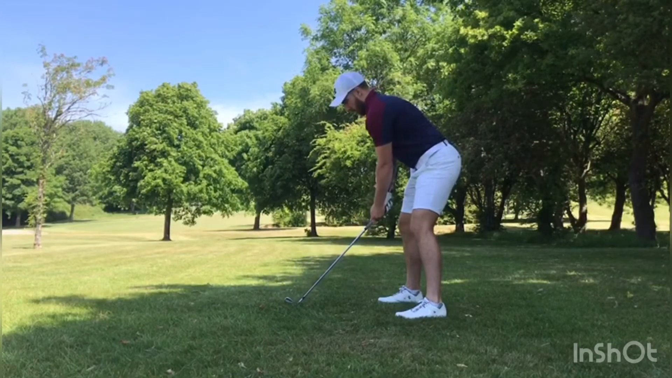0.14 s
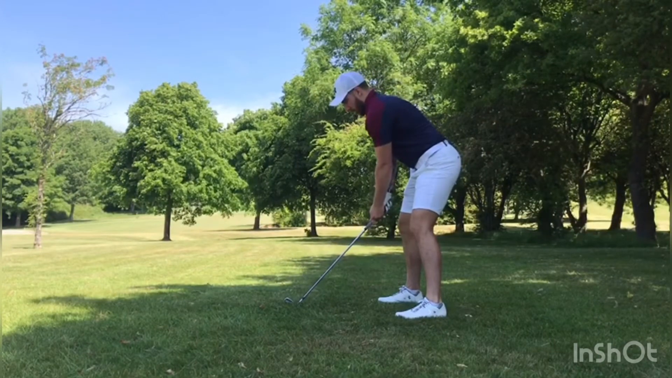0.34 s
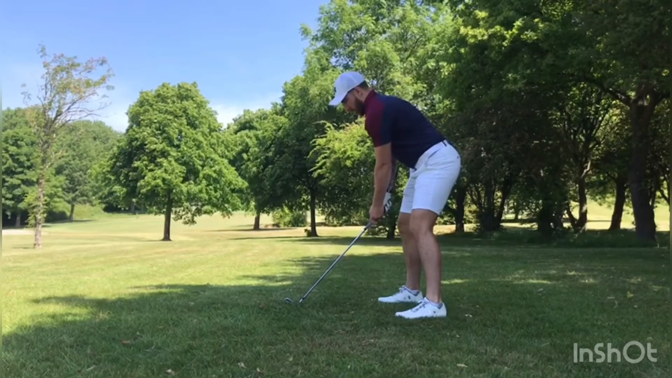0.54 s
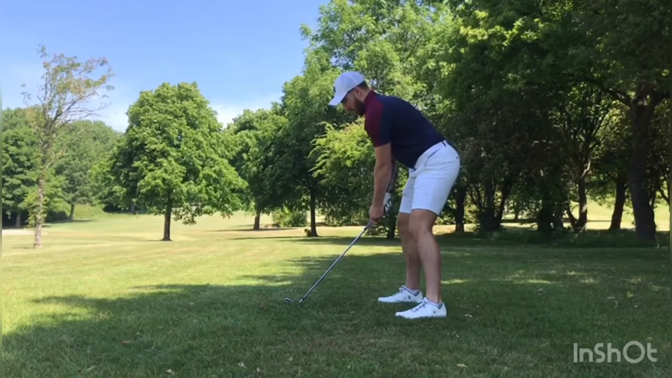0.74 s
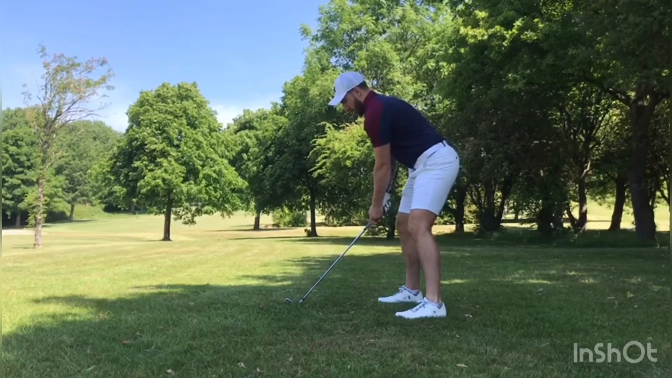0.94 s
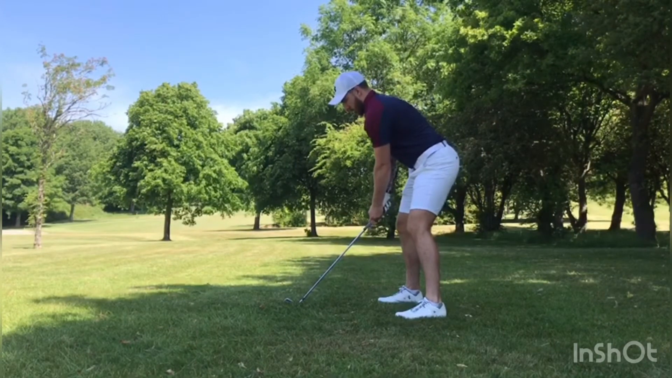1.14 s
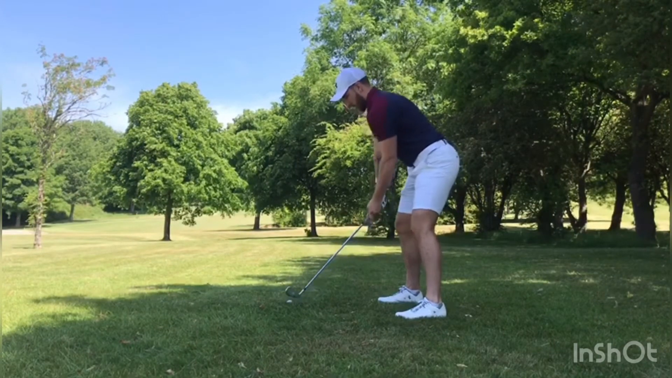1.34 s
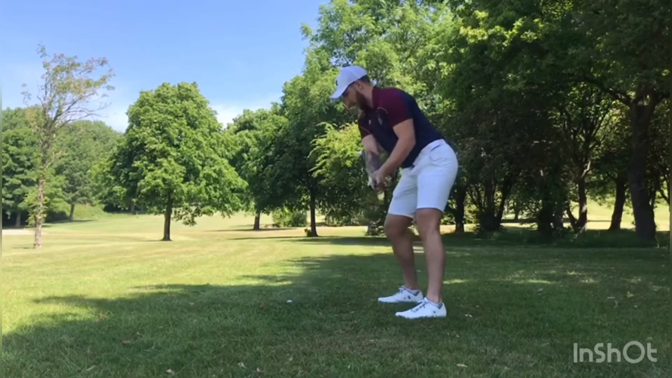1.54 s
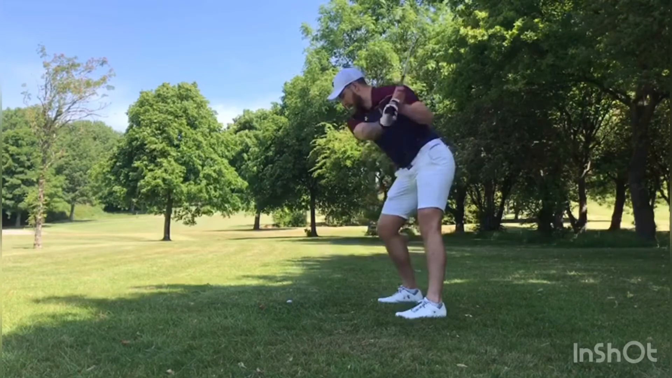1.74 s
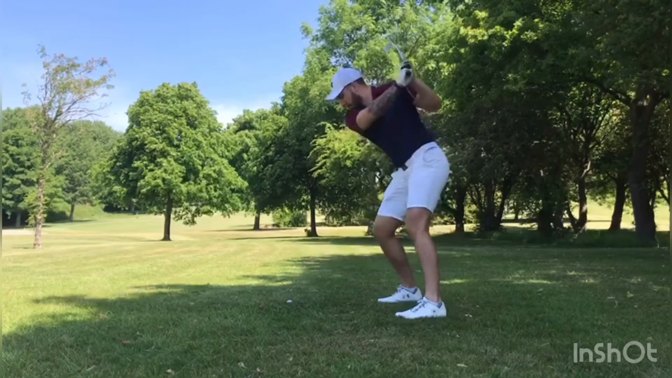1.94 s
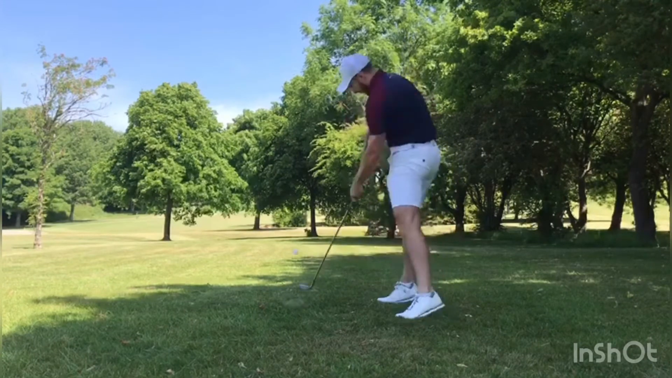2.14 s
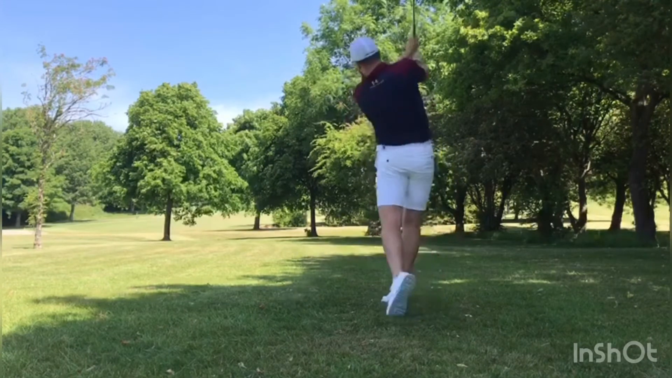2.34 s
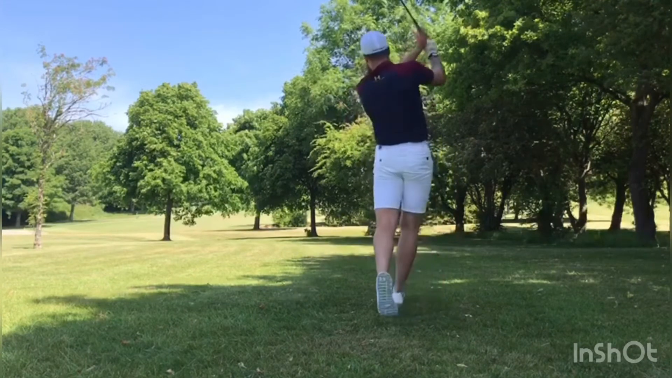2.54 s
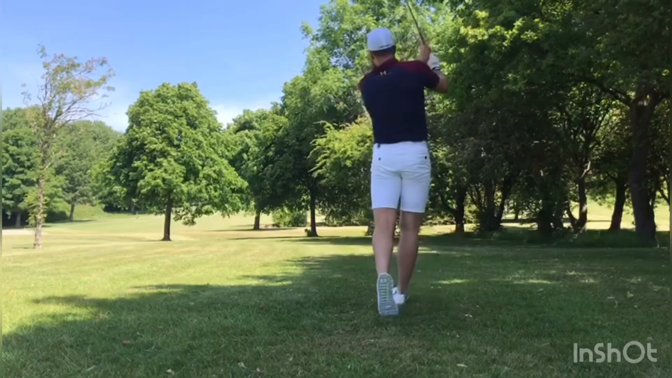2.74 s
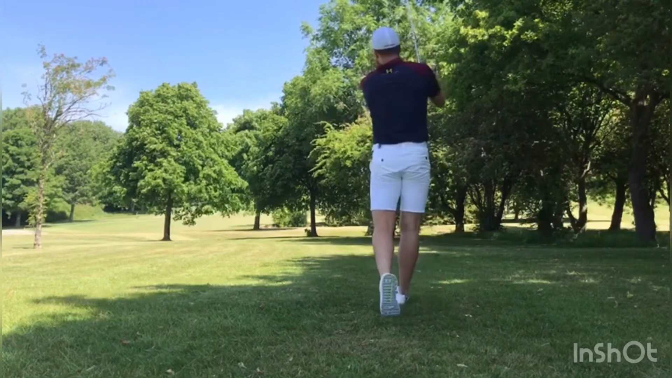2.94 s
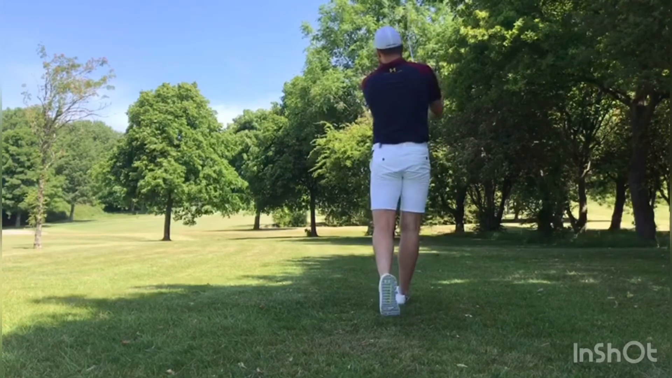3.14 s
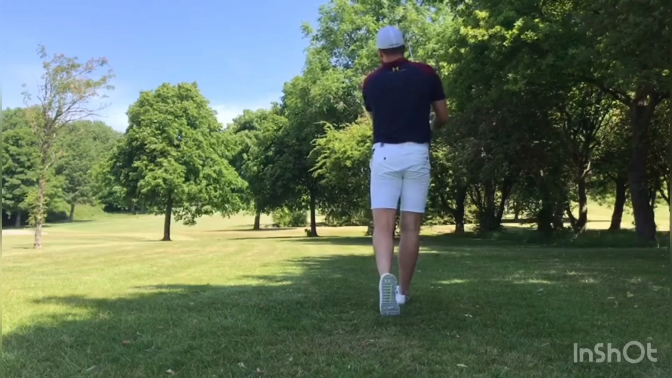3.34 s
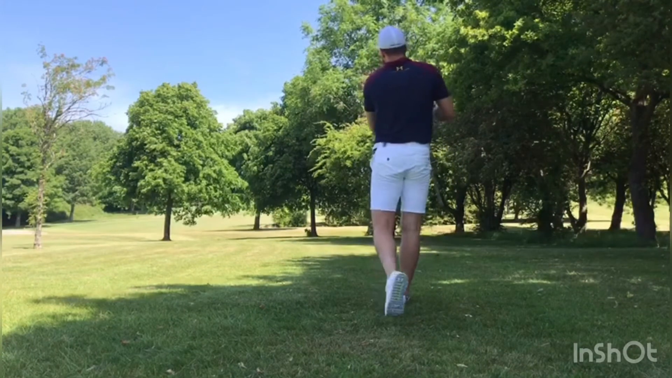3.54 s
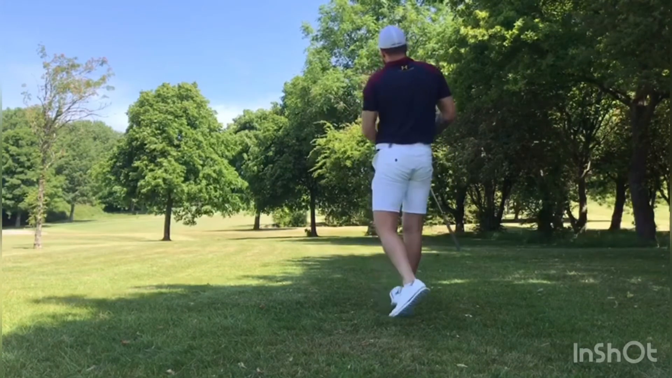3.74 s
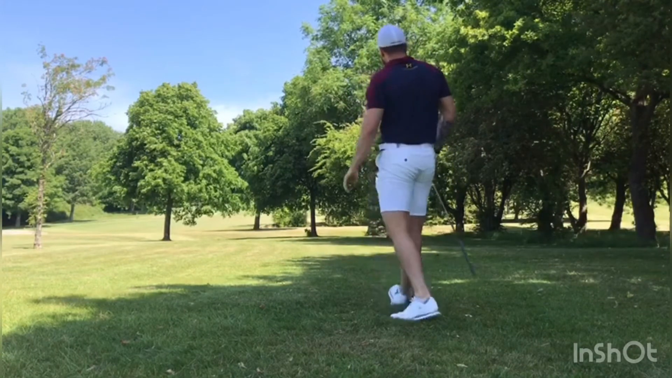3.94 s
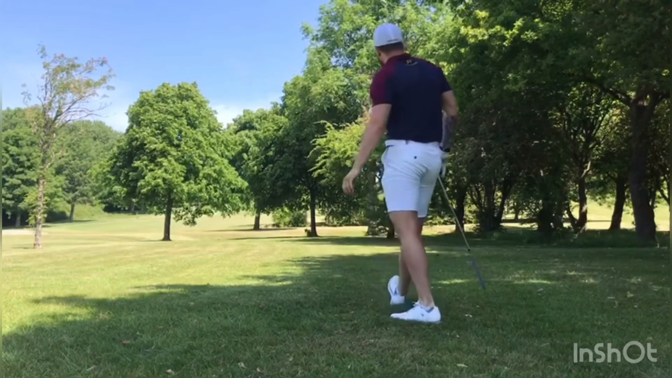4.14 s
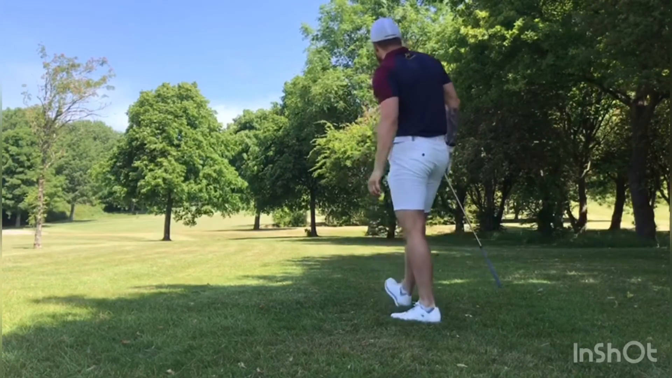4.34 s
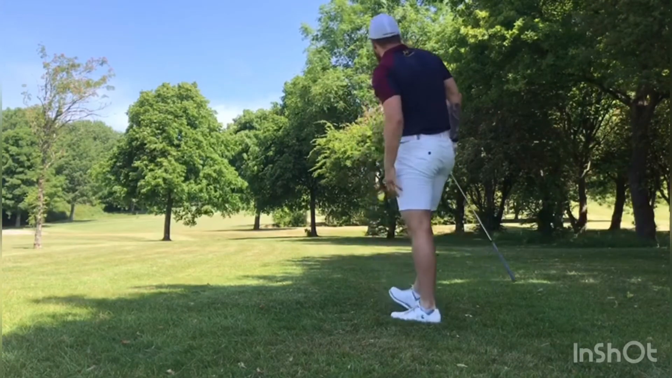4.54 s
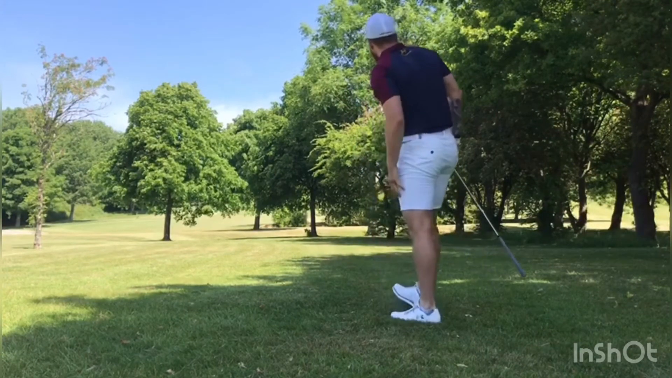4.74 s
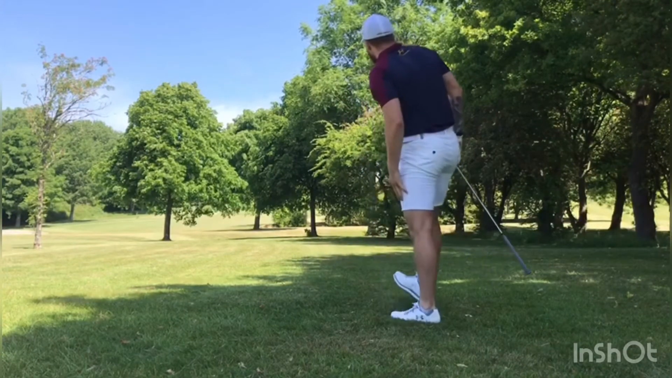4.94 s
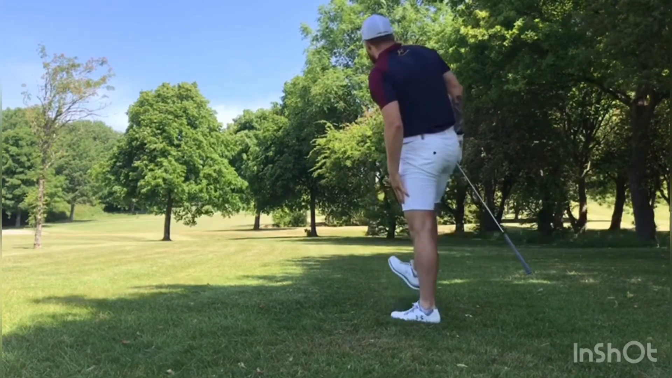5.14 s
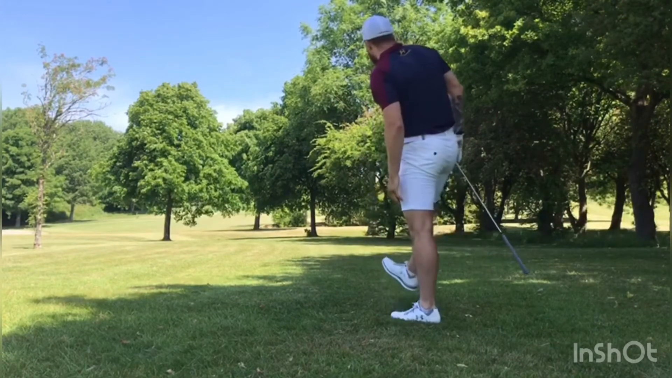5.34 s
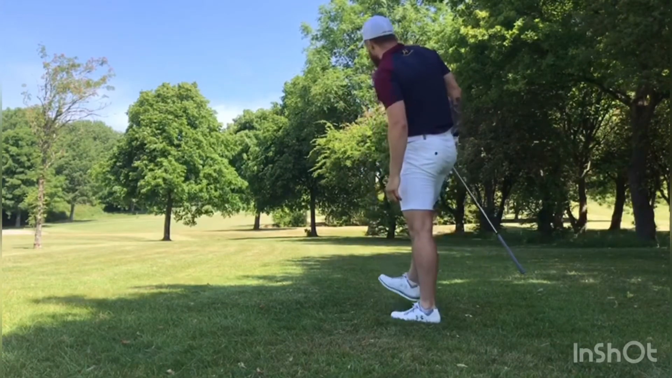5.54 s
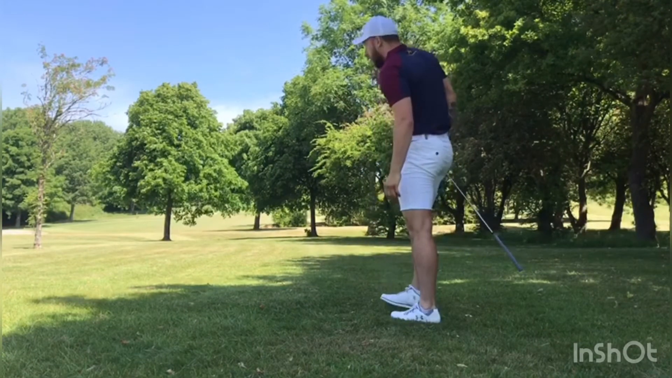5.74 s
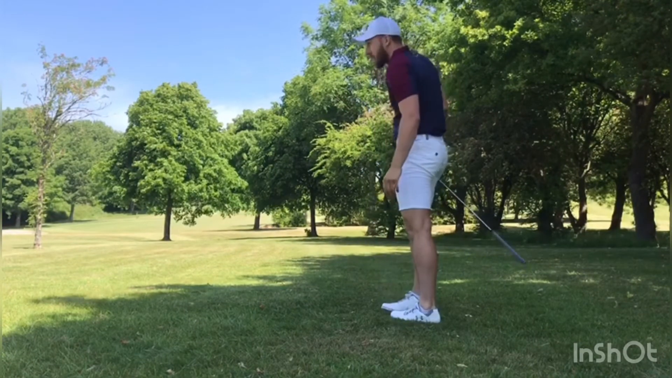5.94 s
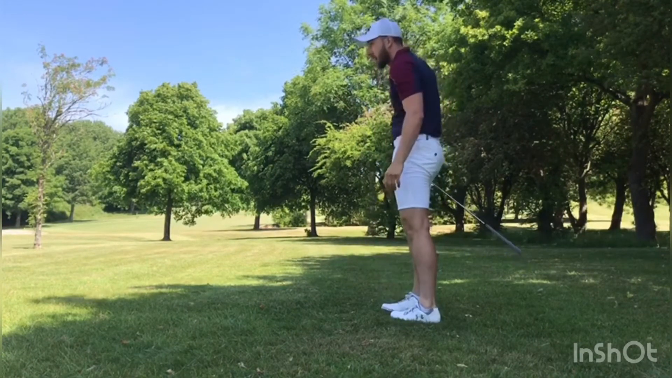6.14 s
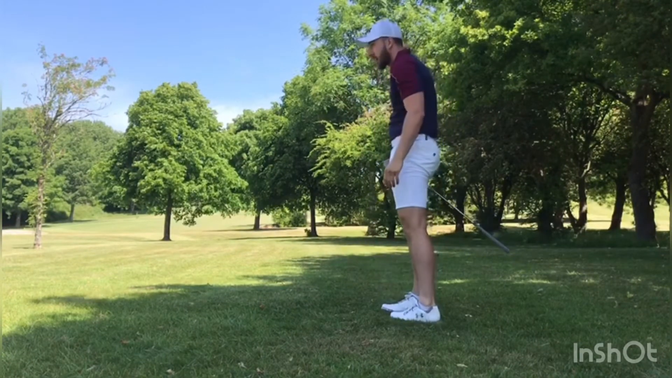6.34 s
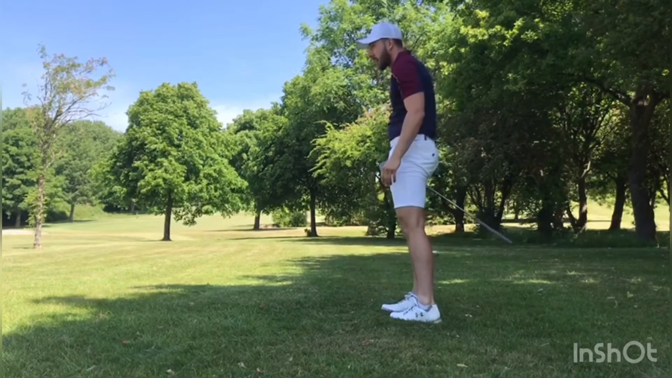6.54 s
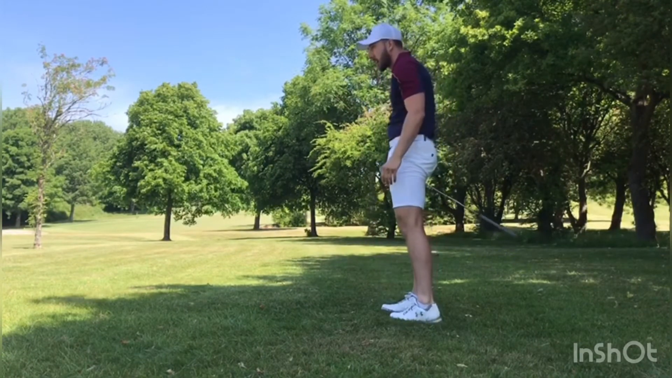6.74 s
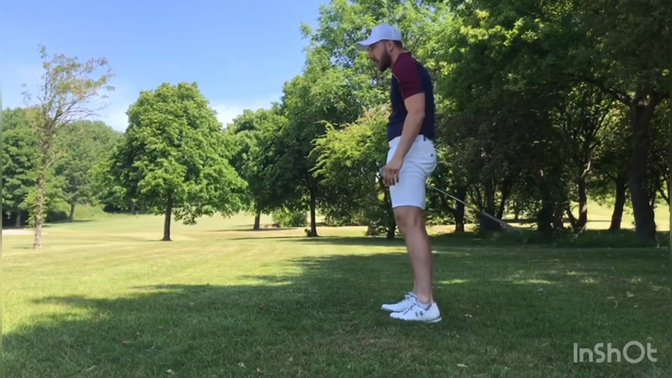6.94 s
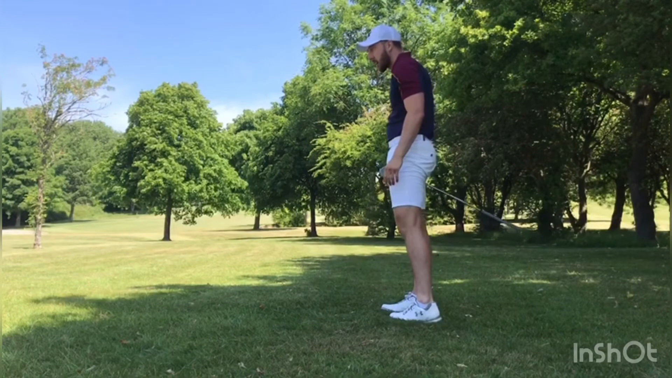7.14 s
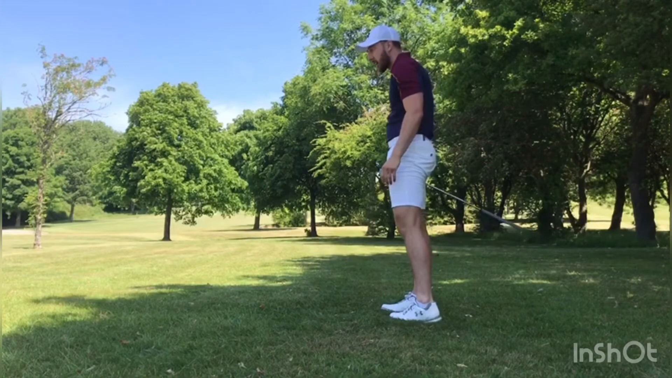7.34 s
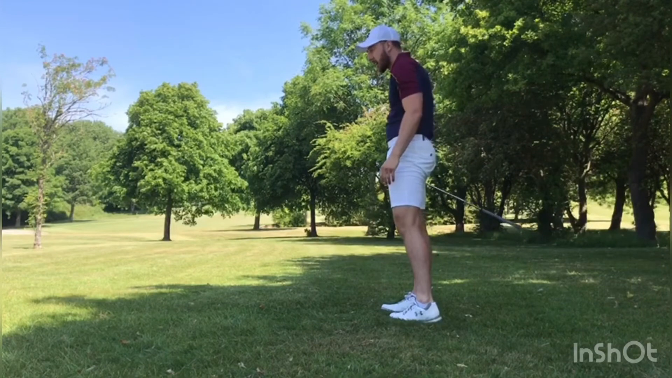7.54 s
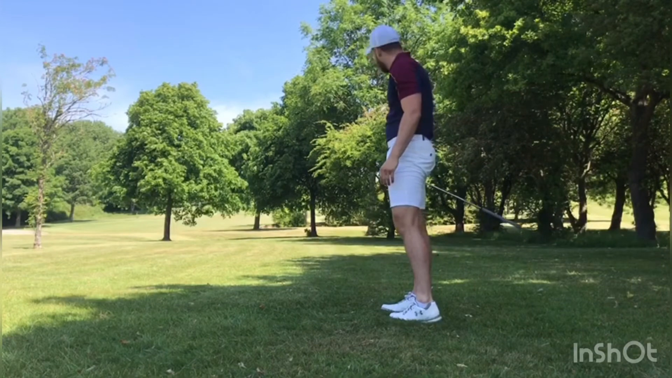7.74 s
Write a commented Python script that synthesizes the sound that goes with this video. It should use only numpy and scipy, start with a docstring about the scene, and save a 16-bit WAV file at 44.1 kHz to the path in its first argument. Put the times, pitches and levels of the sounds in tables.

```python
"""A golf shot beside a wood

A golfer hits one iron shot off the grass. The club swishes through the air, clips the turf and cracks
against the ball, so that ball and club head ring and the ground thuds. Grass sprays, and the trees throw
the crack back. Birds whistle, twitter and trill before and after, blurred by the leaves,
over a quiet outdoor hush, a low rumble and a few faint clicks."""
import sys
import numpy as np
from scipy import signal
from scipy.fft import rfft, irfft
from scipy.io import wavfile
from scipy.ndimage import uniform_filter1d, map_coordinates

SR = 44100
rng = np.random.default_rng(int(sys.argv[2]) if len(sys.argv) > 2 else 0)


def master_out(mix):
    """Clip the mix to full scale and print it as 16-bit PCM to the path in sys.argv[1]."""
    frames = np.transpose(np.atleast_2d(mix))
    ceiling = np.clip(frames, -1, 1)
    pcm = np.round(ceiling * 32767).astype(np.int16)
    wavfile.write(sys.argv[1], SR, pcm)


N = 343098
TIME = np.arange(N) / SR
IMPACT_S = 2.1067   # the club meets the ball


def from_db(db):
    """Turn decibels into a gain to multiply by."""
    return 10 ** (np.asarray(db) / 20)


def rms_one(x):
    """Scale a signal so that its average strength (rms) is 1."""
    return x / np.sqrt(np.mean(x ** 2) + 1e-20)


def level(rows):
    """Gain over time from a curve with seconds first and decibels last; silent outside the curve."""
    rows = np.array(rows)
    inside = uniform_filter1d(1. * ((TIME >= rows[0, 0]) & (TIME <= rows[-1, 0])), size=300)
    return inside * from_db(np.interp(TIME, rows[:, 0], rows[:, -1]))


def pitch(rows):
    """Pitch over time from the second column of a curve."""
    rows = np.array(rows)
    return np.interp(TIME, rows[:, 0], rows[:, 1])


def filtered(x, hz, kind, order=2):
    """Keep the lows, the highs or a band; a higher order cuts more steeply."""
    sections = signal.butter(order, np.clip(hz, 10, .45 * SR), kind, fs=SR, output="sos")
    return signal.sosfilt(sections, x + 1e-18)


def drift(rate):
    """A smooth random wobble of size about 1 that changes about rate times a second."""
    points = rng.standard_normal(8000)
    return rms_one(map_coordinates(points, [TIME * rate], order=2, mode="wrap"))


def noise(colour):
    """Noise of strength 1; the colour says how strong its low and high parts are against each other."""
    hz, db = np.transpose(colour)
    bins_hz = np.maximum(np.fft.rfftfreq(N, 1 / SR), 1)
    gains = from_db(np.interp(np.log(bins_hz), np.log(hz), db))
    return rms_one(irfft(rfft(rng.standard_normal(N)) * gains, N))


def dying(start, decay_s):
    """A gain that jumps to 1 at start and then falls by 60 dB in decay_s."""
    return (TIME >= start) * np.exp(-np.log(1000) * np.clip((TIME - start) / decay_s, 0, 10))


def swell(start, rise_s, decay_s, hold_s=0):
    """A gain that grows to reach 1 at start, holds, and dies away."""
    before, after = np.maximum(start - TIME, 0), np.maximum(TIME - start - hold_s, 0)
    return np.exp(-np.minimum(before / rise_s + np.log(1000) * after / decay_s, 60))


def ring(start, hz, db, decay_s):
    """One dying tone of something struck."""
    return from_db(db) * dying(start, decay_s) * np.sin(2 * np.pi * hz * (TIME - start))


def tone(hz):
    """A pure tone of strength 1 that follows a changing pitch."""
    return np.sqrt(2) * np.sin(2 * np.pi * np.cumsum(hz) / SR)


def add_note(out, start, length, first_hz, middle_hz, last_hz, db, rough=0, fade=.35, swell_db=0):
    """Add a bird note bent through three pitches; rough is a share of its pitch, fade of its length."""
    count, at = int(length * SR), max(int(start * SR), 0)
    along = np.linspace(0, 1, count)
    bend = np.polyfit([0, .5, 1], [first_hz, middle_hz, last_hz], 2)
    tremble = map_coordinates(rng.standard_normal(128), [along * length * 450], order=2, mode="wrap")
    note = tone(np.polyval(bend, along) * (1 + rough * tremble)) * signal.windows.tukey(count, fade)
    out[at:at + count] += (from_db(db + swell_db * (along - .5)) * note)[:N - at]


def among_trees(x, echo_db, decay_s, above_hz=3100):
    """Leaves scatter a sound into a short, soft tail, high notes far more than low ones."""
    scatter = filtered(rng.standard_normal(N) * dying(.0056, decay_s), above_hz, "high")[:SR]
    return x + from_db(echo_db) * signal.fftconvolve(x, scatter / np.linalg.norm(scatter))[:N]


def outdoors():
    """The steady hush of the open course; its low rumble is lumpy and bumps now and then."""
    # colour of the hush: pitch_hz, level_db
    hush_colour = [(13, -42.5), (22, -17), (42, -3), (60, 2), (91, -7), (206, -14), (357, -19.5),
                   (621, -23), (996, -20), (1920, -28), (2310, -27.5), (3810, -31.5), (4400, -33),
                   (4950, -36.5), (5800, -37), (6900, -38), (7700, -41), (9200, -40), (10400, -42.5),
                   (11500, -41.5), (12200, -45), (15300, -72)]
    # soft low bumps: start_s, level_db
    soft_bumps = [(0.534, -60), (3.342, -50), (5.055, -39.5)]
    hush = from_db(-59) * noise(hush_colour)
    lumps = filtered(hush, 108.2, "low", order=1) * (from_db(2 * drift(14)) - 1)
    bumps = sum(ring(start, hz=66, db=db, decay_s=.15) for start, db in soft_bumps)
    return hush + lumps + filtered(bumps, 160, "low")


def near_birds():
    """Songbirds close by flutter a little and are blurred by the leaves; their ticks linger longest."""
    flutter = from_db(.67 * drift(90))
    clear = among_trees((pure_notes() + buzzes()) * flutter, echo_db=-6, decay_s=.45)
    ticking = among_trees(ticks(), echo_db=-4, decay_s=.9, above_hz=2100)
    scratchy = scratchy_notes() * from_db(1.5 * drift(260))
    return clear + ticking + among_trees(scratchy, echo_db=-4, decay_s=.5, above_hz=2600)


def pure_notes():
    """Clear bird notes: flute-like phrases that quiver in pitch and level, whistles and swoops."""
    # gliding phrases, one curve each: time_s, pitch_hz, level_db
    phrases = [
        [(0.14, 2038, -70), (0.162, 2094, -56), (0.194, 2170, -68), (0.212, 2230, -54), (0.234, 2894, -50.5),
         (0.258, 2554, -68)],
        [(0.715, 1650, -74), (0.735, 2020, -63), (0.77, 2280, -58.5), (0.812, 2237, -58), (0.875, 1970, -69),
         (0.905, 1660, -71)],
        [(7.025, 1940, -65), (7.071, 1750, -60.5), (7.112, 1860, -66), (7.148, 2127, -54.5),
         (7.21, 2070, -52.5), (7.255, 2010, -57.5), (7.28, 1890, -72)],
        [(7.495, 1925, -56), (7.54, 1950, -58), (7.57, 1945, -54), (7.629, 1954, -56.5), (7.644, 1750, -70)],
    ]
    # how far each phrase quivers: share_of_pitch
    quiver_depths = [.008, .024, .002, .003]
    # plain whistles: start_s, length_s, pitch_hz, level_db, sag_share, rough_share
    whistles = [(0, 0.081, 2415, -53.5, 0.022, 0.018), (.468, .022, 2950, -66, .03, .01),
                (.577, .04, 3080, -67, -0.012, 0.01), (0.627, 0.09, 3870, -70, 0.044, .025),
                (1.022, 0.075, 2447, -57, -0.0071, 0.01), (1.16, 0.057, 4100, -73, .01, 0.07),
                (3.478, .06, 5080, -77.5, .026, 0.04), (3.597, 0.079, 3270, -73, 0.019, 0),
                (3.784, 0.063, 4310, -64.5, 0.018, 0), (3.794, 0.026, 1930, -63, .026, 0.02),
                (7.356, 0.11, 2630, -64, -0.0088, 0.02)]
    # notes that swoop down and curl up again: start_s, middle_hz, level_db, curl_share
    swoops = [(.98, 3640, -59.5, .01), (3.665, 4200, -61, .08), (3.836, 3620, -62, 0.071)]
    out, lift_db = np.zeros(N), 1
    waver = 1 + .0025 * drift(220)
    vibrato = tone(hz=66 * (1 + .4 * drift(90)))
    for phrase, depth in zip(phrases, quiver_depths):
        quiver = depth * vibrato
        gain = from_db(lift_db - 84 * quiver) * level(phrase)   # softer as the pitch swings up
        out += gain * tone((waver + quiver) * pitch(phrase))
    for start, length, hz, db, sag, rough in whistles:
        add_note(out, start, length, hz * (1 + sag), hz, hz * (1 - sag), db, rough=rough, fade=.5)
    for start, hz, db, curl in swoops:
        add_note(out, start, .05, 1.25 * hz, hz, hz * (1 + curl), db, rough=.005, fade=.8)
    return out


def distant_birds(count=30, lowest_hz=2300, highest_hz=6000):
    """Faint chirps at random moments and pitches from all over the wood, mostly echo."""
    out = np.zeros(N)
    for when, height, slope in rng.random((count, 3)):
        hz = lowest_hz * (highest_hz / lowest_hz) ** height
        glide = .2 * (slope - .5)
        bend = hz * (1 + glide), hz, hz * (1 - glide)
        add_note(out, when * N / SR, .07, *bend, db=-82 - 4 * height, rough=.012)
    return among_trees(out, echo_db=1.5, decay_s=.6, above_hz=2000)


def clicks(decay_s=.0075):
    """Tiny dry clicks, barely above the hush."""
    # short bursts of noise: start_s, level_db, pitch_hz
    bursts = [(.124, -64, 10000), (.931, -62, 10000), (1.131, -64, 10000), (1.881, -56, 4200),
              (1.935, -61, 10000), (2.332, -59.5, 9500), (2.366, -57.5, 7500), (2.935, -61, 10030),
              (3.941, -61, 10000), (5.946, -62.5, 10000), (6.147, -63, 10000), (6.952, -60, 10000)]
    out, age = np.zeros(N), TIME[:SR // 20]
    for start, db, hz in bursts:
        burst = rms_one(filtered(rng.standard_normal(len(age)), [.85 * hz, 1.2 * hz], "band"))
        at = int(start * SR)
        out[at:at + len(age)] += burst * from_db(db - 60 * age / decay_s)
    return out


def scratchy_notes():
    """Quick, rough bird notes: twitters, and later a two-voiced climb into the trill."""
    # twitters sweep up, break and flick back down: start_s, length_s, foot_hz, top_hz, level_db
    twitters = [(0.374, 0.049, 3400, 5980, -63.5), (0.436, 0.035, 3600, 5100, -61),
                (0.488, 0.034, 3350, 4700, -63), (0.54, 0.035, 3440, 4600, -66),
                (1.24, 0.09, 2900, 4480, -69.5), (1.24, 0.065, 6950, 8760, -74.5),
                (1.361, .028, 2350, 3020, -66)]
    # thin tones above the twitters: start_s, length_s, first_hz, middle_hz, last_hz, level_db
    overtones = [(0.376, .026, 6800, 7900, 8600, -78), (.37, .06, 6800, 6600, 6450, -76),
                 (.44, .025, 8500, 8600, 8450, -79), (.488, .03, 8600, 8450, 8400, -80)]
    # arched notes that climb towards the trill: start_s, top_hz, level_db, after_note_hz
    climb = [(4.013, 3700, -70, 2980), (4.087, 3900, -61, 3480), (4.156, 4000, -59, 3680)]
    out = np.zeros(N)
    for start, length, foot, top, db in twitters:
        rise_s, fall_s = .66 * length, .26 * length
        add_note(out, start, rise_s, foot, (foot + top) / 2, top, db, rough=.02, fade=.5, swell_db=-6)
        add_note(out, start + length - fall_s, fall_s, top, 1.15 * foot, foot, db - 1, rough=.025)
    for note in overtones:
        add_note(out, *note, rough=.015)
    for start, top, db, after_hz in climb:
        add_note(out, start, .04, .9 * top, top, .9 * top, db, rough=.02)
        # a lower note follows each arch, while the second voice sweeps up underneath
        add_note(out, start + .034, .034, .97 * after_hz, after_hz, after_hz, db - 1, rough=.012)
        add_note(out, start + .022, .036, *np.linspace(2100, 2810, 3), db=-65, rough=.018)
    return out


def far_bird():
    """A high note that gains strength as it falls, repeated deep in the wood and blurred by leaves."""
    # the bird's calls: start_s, level_db
    calls = [(.64, -78), (.787, -77), (.932, -77), (1.081, -74.5), (1.231, -73.5), (1.381, -75),
             (1.528, -76), (1.745, -82)]
    # the falling note: length_s, first_hz, middle_hz, last_hz
    note = (.064, 7100, 6250, 5050)
    out = np.zeros(N)
    for start, db in calls:
        add_note(out, start, *note, db, rough=.014, fade=.43, swell_db=4)
    flutter = from_db(-3 + 3 * drift(110))
    return among_trees(out * flutter, echo_db=-.5, decay_s=.5)


def ticks(hold_s=.017, fall_s=.01099, held_hz=2373):
    """Thin bird ticks: a short swelling note that breaks into a steep, weaker fall."""
    # the ticking calls: start_s, level_db
    calls = [(1.387, -65.5), (3.927, -63), (5.258, -63), (5.392, -60.5), (5.591, -62)]
    out = np.zeros(N)
    fall_hz = np.linspace(held_hz + 200, 1530, 3)
    for start, db in calls:
        add_note(out, start, hold_s, held_hz, held_hz, held_hz, db - 1, rough=.017, swell_db=5)
        add_note(out, start + .6 * hold_s, fall_s, *fall_hz, db - 3, rough=.02)
    return out


def swish(peak_s=2.098, rounding_s=.016, fall_db_per_s=335):
    """Shaft and head tear the air, loudest and brightest at the fast bottom of the swing."""
    # colour of the rushing air: pitch_hz, level_db
    air_colour = [(100, -8), (400, 1.5), (1000, -0.5), (2500, -1), (5000, -7), (8000, -11.5),
                  (11500, -10.5)]
    away_s = np.hypot(TIME - peak_s, rounding_s) - rounding_s
    gain = from_db(-41 - fall_db_per_s * np.minimum(away_s, 1))
    speed = (gain / gain.max()) ** .36
    air = noise(air_colour)
    dull_air = filtered(air, 1000, "low", order=1)
    return gain * (speed * air + 1.16 * (1 - speed) * dull_air)


def strike():
    """The club clips the turf and snaps against the ball; ball and head ring, and the ground thuds."""
    # the club brushes the turf, then digs in after the ball: start_s, level_db, lowest_hz, decay_s
    turf_touches = [(2.1027, -13, 7000, .005), (2.1035, -22, 3500, .03), (2.1163, -24, 1200, .012)]
    # colour of the snap: pitch_hz, level_db
    snap_colour = [(700, -35), (1500, -8), (3300, -7), (4100, 3), (4700, 0), (5600, -4), (9500, -.5),
                   (11000, -2), (12000, -20)]
    # ringing tones of the club head: pitch_hz, level_db, decay_s
    head_tones = [(4240, -17, .012), (4468, -35, .06), (5290, -27, .014), (6860, -32, .025),
                  (7310, -33, .04), (8100, -19, .003), (8585, -31, .035), (9850, -24.5, .035),
                  (10300, -14, .003), (11000, -30, .03)]
    # tones of the ball's tock: pitch_hz, level_db, decay_s
    ball_tones = [(900, -13, 0.0045), (1090, -18, 0.011), (1555, -6, 0.01), (2010, -12, 0.0089),
                  (2280, -11.5, 0.011), (2710, -14, 0.018), (2999, -20, 0.013)]
    # tones of the ground under the blow: delay_s, pitch_hz, level_db, decay_s
    ground_tones = [(0.0008, 116, -28, .072), (0, 255, -34, .069), (-.0005, 350, -19, 0.02),
                    (-.0006, 532, -28.5, 0.016), (.0016, 612, -22.5, .0157)]
    turf = np.zeros(N)
    for start, db, lowest_hz, decay_s in turf_touches:
        brush = filtered(rng.standard_normal(N), [lowest_hz, 11300], "band")
        turf += brush * from_db(db) * dying(start, decay_s)
    snap = noise(snap_colour) * from_db(-10.3) * dying(IMPACT_S + .0002, decay_s=.0085)
    # every second tone of the head starts by swinging the other way
    head = from_db(.1) * sum(ring(IMPACT_S, *row) * (-1) ** k for k, row in enumerate(head_tones))
    # the soft ball stays on the face for a moment, so its tock swells just after the snap
    ball = sum(ring(IMPACT_S + .00088, *row) for row in ball_tones)
    ball = filtered(ball, 3050, "low", order=10)
    ball = filtered(ball, 820, "high", order=7)
    thud = sum(ring(IMPACT_S + delay, hz, db, decay_s) for delay, hz, db, decay_s in ground_tones)
    return turf + snap + head + ball + filtered(thud, 41, "high")


def spray():
    """Torn grass and soil patter down in a fading shower."""
    # colour of the shower: pitch_hz, level_db
    shower_colour = [(300, -15.5), (1000, -1.5), (2800, 0.5), (4200, -7), (6000, -3), (9000, -7.5),
                     (11500, -8.5)]
    patter = from_db(-39.5 + 1.8 * drift(500))
    return patter * noise(shower_colour) * dying(IMPACT_S + .0184, decay_s=.38)


def wood_echo():
    """Trunks and leaves return the crack as an uneven wash of noise, one swell for each row of trees."""
    # echoes from the rows of trees: delay_s, level_db, decay_s
    echoes = [(.08, -50, .28), (.136, -55, .2), (.162, -53.5, 0.32), (.213, -59, .15), (.25, -67, 1.6)]
    # colour of those echoes: pitch_hz, level_db
    echo_colour = [(200, -6), (600, -9), (1200, -1), (2300, -1.5), (3350, 0.5), (3900, -12.5), (4700, -11),
                   (6200, -6), (7800, -17.5), (11500, -21)]
    power = sum((from_db(db) * swell(IMPACT_S + delay, rise_s=.016, decay_s=decay_s)) ** 2
                for delay, db, decay_s in echoes)
    return np.sqrt(power) * noise(echo_colour) * from_db(1.8 * drift(300))


def far_echo():
    """The shot comes back once more from the far edge of the course, as a dull swell of noise."""
    # colour of the late echo: pitch_hz, level_db
    echo_colour = [(60, -12), (170, 1.5), (400, -7), (800, -14), (1400, -12), (3000, -26), (8000, -45)]
    return from_db(-61) * noise(echo_colour) * swell(start=2.78, rise_s=.025, decay_s=.9)


def trill():
    """Both sides of a bird's voice box sing at once: a whistle and rough side notes, ending in a rasp."""
    # the repeated syllables: start_s, whistle_hz, whistle_db, side_db
    syllables = [(4.218, 4200, -53.5, -70), (4.331, 4485, -54, -67), (4.449, 4620, -58.5, -63.5),
                 (4.558, 4466, -52, -63.5), (4.669, 4490, -52.5, -64), (4.771, 4644, -57.5, -64.5),
                 (4.89, 4490, -57, -66), (5.006, 4450, -57.5, -70)]
    # side notes of each syllable: delay_s, length_s, first_hz, middle_hz, last_hz, level_db, rough_share
    side_notes = [(-.002, .026, 2750, 2330, 2300, -3.5, .022), (.014, .045, 4350, 4150, 3950, 1, .025),
                  (-.014, .05, 7450, 7000, 6650, -7.5, .018), (-.016, .036, 9750, 9250, 9050, -15, .014),
                  (.008, .024, 9200, 10100, 9900, -14, .025), (.011, .022, 6000, 7250, 8000, -7, .028),
                  (.03, .02, 8250, 8600, 8600, -11, .015)]
    # steep slides down through the rasp: start_s, length_s, first_hz, middle_hz, last_hz, level_db
    slides = [(5.052, .04, 4600, 4050, 3000, -60), (5.095, .048, 4400, 3750, 2600, -59.5)]
    # loudness of a hoarse haze around the trill: time_s, level_db
    haze_curve = [(3.95, -97), (4.12, -67), (4.26, -66), (4.7, -73), (5.12, -70.5), (5.3, -89)]
    # colour of that haze: pitch_hz, level_db
    haze_colour = [(1500, -24), (2600, 4), (4300, 6), (5400, -6), (6900, 7), (8000, -11), (9300, -5),
                   (10500, -8), (11800, -4)]
    whistles, sides = np.zeros(N), np.zeros(N)
    for start, hz, whistle_db, side_db in syllables:
        bend = 1.015 * hz, .998 * hz, hz
        add_note(whistles, start + .002, .07, *bend, whistle_db, rough=.009, fade=.2, swell_db=-1)
        for delay, length, *side_hz, note_db, rough in side_notes:
            stretch, stress_db = rng.normal([1, 0], [.012, 1])   # no two notes are quite alike
            bend = stretch * np.array(side_hz)
            add_note(sides, start + delay, length, *bend, side_db + note_db + stress_db, rough=rough)
    for slide in slides:
        add_note(sides, *slide, rough=.045, swell_db=-7)
    whistles += rasp()
    throb = from_db(-2.5 + 2 * drift(150) + 2 * tone(hz=85 + 10 * drift(18)))
    # the haze surges with each syllable
    surge = uniform_filter1d(sum(dying(start, decay_s=.4) for start, *_ in syllables), size=800)
    haze = level(haze_curve) * noise(haze_colour) * (.62 + .67 * surge)
    flutter = from_db(-1.5 + 2 * drift(300))
    blurred_sides = among_trees(sides * flutter, echo_db=-4.5, decay_s=.27)
    return among_trees(whistles * throb, echo_db=-3, decay_s=.54) + blurred_sides + haze


def rasp(start=5.06, first_hz=4700, sag_hz_per_s=6500, spread_hz=450):
    """The trill's harsh last note keeps dipping away from a top pitch that itself sags."""
    top_hz = first_hz - sag_hz_per_s * np.clip(TIME - start, 0, .2)
    gain = from_db(-57.5) * swell(start, rise_s=.012, hold_s=.06, decay_s=.067)
    return gain * tone(top_hz - spread_hz * np.abs(drift(500)))


def buzzes(count=5, spacing_s=.0238, length_s=.02, swell_db=10):
    """A bird's run of quick sweeps swells early and bends late, leading into a flute-like phrase."""
    # the runs: start_s, first_hz, last_hz, sweep_hz, last_level_db
    runs = [(6.911, 2330, 2140, 490, -57.5), (7.381, 1940, 1984, -170, -54)]
    out = np.zeros(N)
    for start, first_hz, last_hz, sweep_hz, last_db in runs:
        for k, along in enumerate(np.linspace(0, 1, count)):
            hz = first_hz + (last_hz - first_hz) * along ** 2
            sweep = hz - sweep_hz / 2, hz, hz + sweep_hz / 2
            db = last_db - swell_db * (1 - along) ** 2
            add_note(out, start + k * spacing_s, length_s, *sweep, db, fade=.58)
    return out


def scene():
    """The shot, its echoes, the birds and the open air, together in one channel."""
    shot = swish() + strike() + spray() + wood_echo() + far_echo()
    return (shot + near_birds() + trill() + far_bird() + outdoors() + distant_birds() + clicks())[None]


def record(dry):
    """The loudest peak is rounded off and the highest treble is cut steeply."""
    ceiling, cutoff_hz = .7, 12450
    rounded = ceiling * np.tanh(dry / ceiling)
    return signal.sosfilt(signal.cheby2(16, 50, cutoff_hz, fs=SR, output="sos"), rounded)


dry = scene()
out = record(dry)
master_out(out)
```